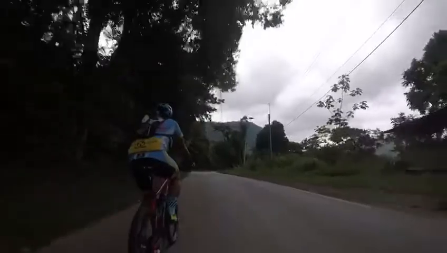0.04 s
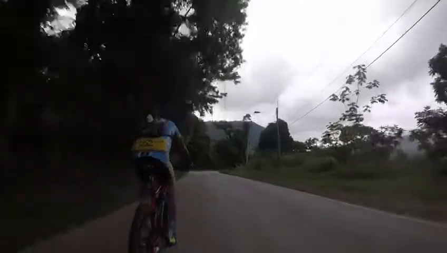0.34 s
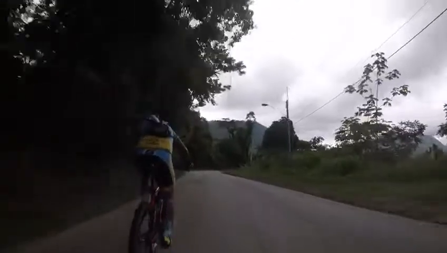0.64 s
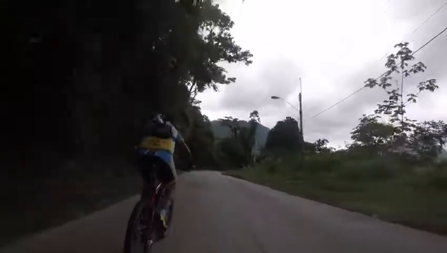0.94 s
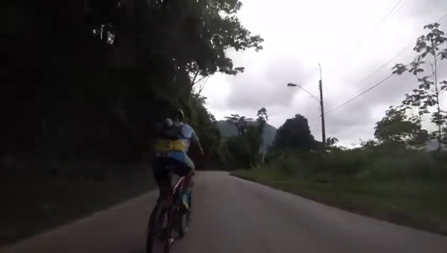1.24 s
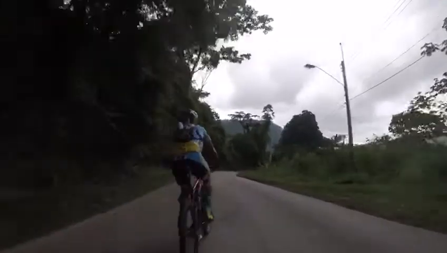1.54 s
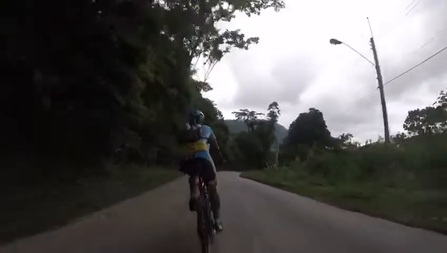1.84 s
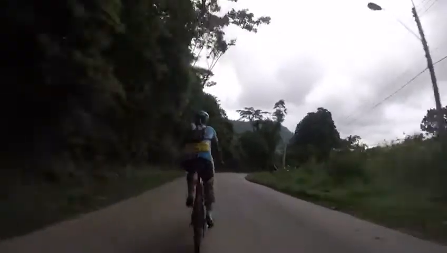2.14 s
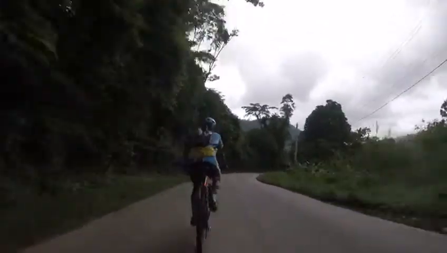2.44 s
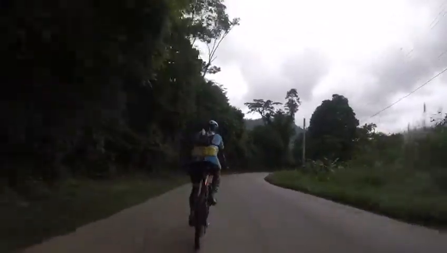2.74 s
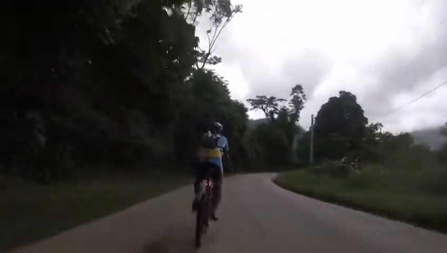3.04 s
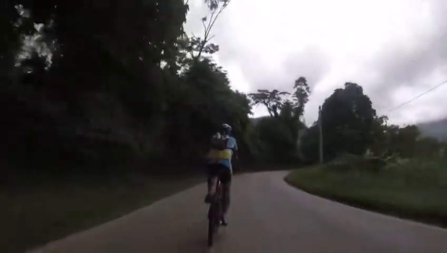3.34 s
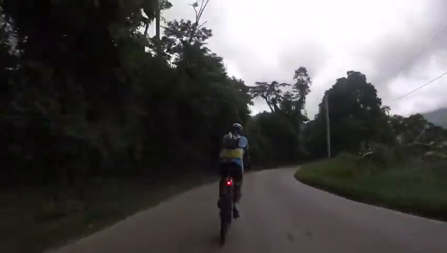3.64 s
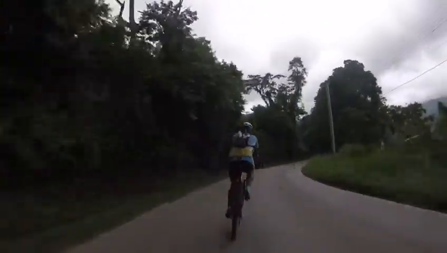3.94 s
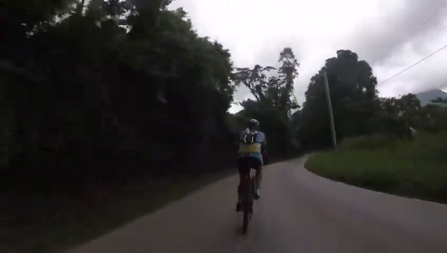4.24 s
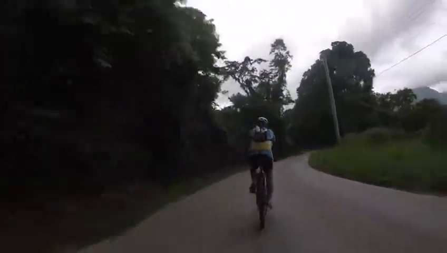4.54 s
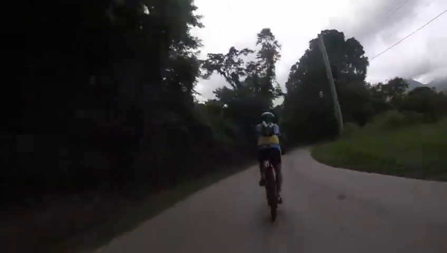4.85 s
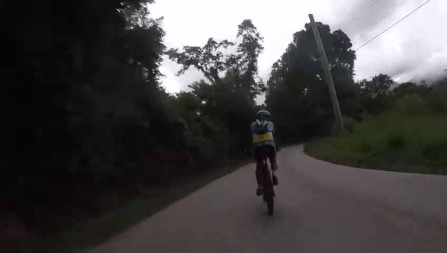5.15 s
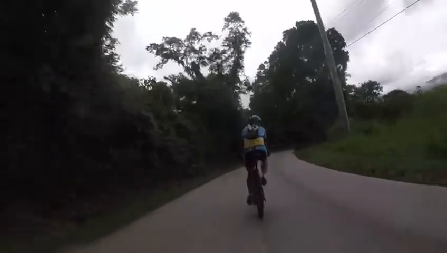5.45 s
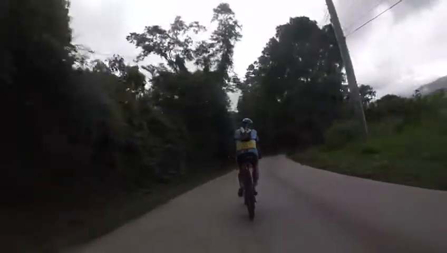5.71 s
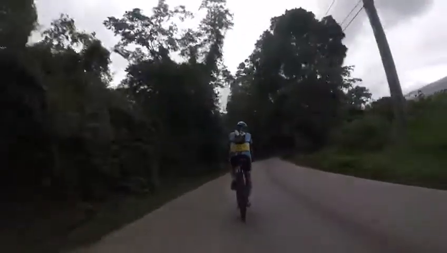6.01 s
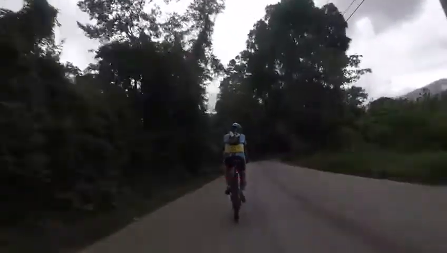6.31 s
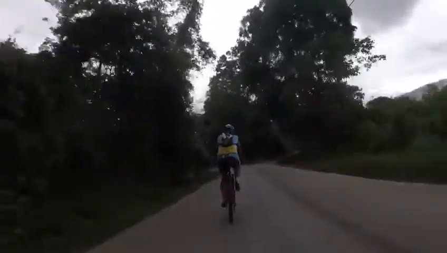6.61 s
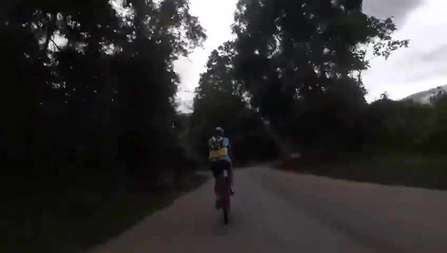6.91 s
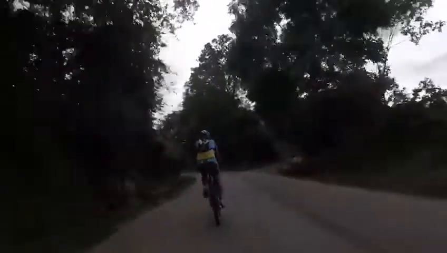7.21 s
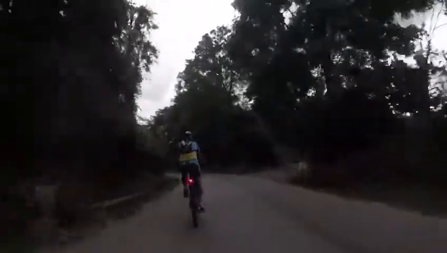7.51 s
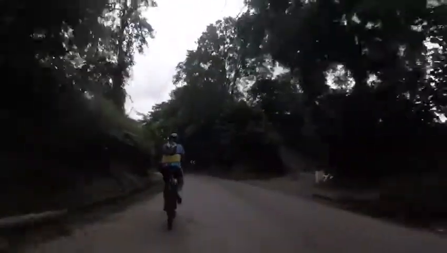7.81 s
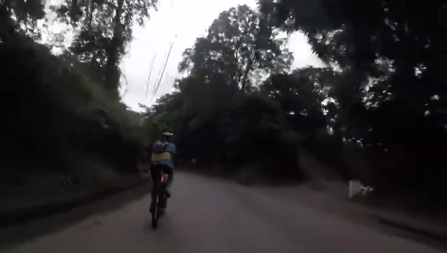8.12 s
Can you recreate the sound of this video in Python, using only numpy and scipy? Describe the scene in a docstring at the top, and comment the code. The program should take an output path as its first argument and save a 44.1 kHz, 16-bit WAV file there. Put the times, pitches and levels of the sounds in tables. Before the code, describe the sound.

Strong wind thumps and roars on the microphone of a fast-moving bicycle for the whole eight seconds, with a ragged rush and short, dull crackles. A thin tyre hiss and a faint, mid-pitched whir lie underneath. During the first two seconds the crackles come thickly and the chain shimmers and jingles lightly. From about 1.8 seconds the roar swells with two low, hollow notes, and the camera mount clicks over bumps around 2 and 3.2 seconds. The whir firms into a hum from 3.7 to 4.7 seconds, ending in a short falling tone. The hollow roar swells again between 5 and 6.5 seconds. The hum returns in pulses from 6.7 to 7.6 seconds, sliding down twice. Around 7.7 seconds rough road rattles the mount and the bicycle frame gives a brief metallic clank, while the wind keeps going.

```python
"""Wind thumps and roars on the microphone of a camera riding a bicycle fast down an open road.
Swirls of air (eddies) rush round the camera's housing, blow two low notes in its hollows and burst
with dull cracks. A whir near 600 Hz firms into a hum in two spells, where the airflow catches it.
Tyres hiss, the chain shimmers, and bumps make the chain jingle, the mount click and the frame clank.
A limiter turns the sound down round the loudest thumps."""
import sys
import numpy as np
from scipy import signal
from scipy.fft import rfft, irfft, next_fast_len
from scipy.io import wavfile
from scipy.ndimage import uniform_filter1d, minimum_filter1d, map_coordinates

SR = 44100
rng = np.random.default_rng(int(sys.argv[2]) if len(sys.argv) > 2 else 0)


def int16_out(signal):
    """Quantize to a 16-bit WAV file."""
    q = np.round(np.clip(np.atleast_2d(signal).T, -1, 1) * 32767)
    wavfile.write(sys.argv[1], SR, q.astype(np.int16))


N = 360297

# Levels in the tables are relative: each sound's own gain is added to them.
# tone colours, from low notes to high (f/Hz, level/dB)
BUFFET_SPECTRUM = [(8, -8), (20, 1), (32, 2.5), (46, -1), (65, -2), (95, -4), (130, -0.5), (155, -16.5),
                   (220, -18), (400, -40.5), (800, -92)]
WAKE_SPECTRUM = [(90, -31.5), (150, 0.5), (225, -2.5), (280, 2), (326, -5), (375, -9), (425, -6),
                 (472, -13), (515, -12), (590, -11.5), (720, -28), (1400, -56), (3000, -100)]
RUSH_SPECTRUM = [(250, -10.5), (450, 6.5), (560, 3.5), (650, 4.5), (750, -1.5), (860, 1), (970, -1.5),
                 (1150, 1.5), (1400, -8.5), (2000, -25), (4000, -33.5), (8000, -86.5)]
RASP_SPECTRUM = [(400, -29), (900, 0), (1450, 4.5), (2000, -0.5), (2800, -8), (3600, -25), (5000, -22),
                 (8000, -40), (12000, -65.5)]
WHIR_SPECTRUM = [(300, -60.5), (500, -23.5), (560, -7.5), (605, -2), (650, -9), (710, -17), (1200, -68),
                 (3000, -110)]
HISS_SPECTRUM = [(1500, -12), (3000, 9), (4200, -2), (4950, 0.5), (5800, -5), (6500, -2), (7500, -5.5),
                 (8600, -11.5), (9400, -9.5), (11000, -12.5), (12500, -29.5)]
CRACK_SPECTRUM = [(400, -21.5), (900, -4.5), (1300, 5), (1600, 7), (2100, -2.5), (2800, -12), (3600, -22.5),
                  (5000, -28.5), (8000, -48), (12000, -71.5)]

# gusts and lulls on the microphone (t/s, length/s, rise/dB)
GUSTS_AND_LULLS = [(-.1, 0.43, -0.5), (.47, 0.25, -1.5), (2.48, .35, -2.5), (4.58, 0.1, 1), (5.0, 0.3, -1),
                   (5.3, 0.21, 0)]
BUFFET_DB, GUST_FADE_S, GUST_SAG_S = -11.5, 0.06, 3
# swells of the wake, the churning air behind the housing (t/s, length/s, rise/dB)
WAKE_SWELLS = [(1.76, 2.17, 6), (2.0, 0.36, 1), (5.18, .25, 3.5), (5.6, .8, 4.5)]
WAKE_DB, WAKE_ATTACK_S, WAKE_RELEASE_S, WAKE_SAG_S = -21, 0.26, 0.25, 14
# swells of the lower and the upper hollow's note (t/s, length/s, rise/dB)
LOW_NOTE_SWELLS = [(.1, 1.46, 3), (1.78, 0.59, 9), (2.45, 1.25, 5), (5.24, .22, 6.5), (5.8, 0.75, 4.5)]
HIGH_NOTE_SWELLS = [(0.8, 0.54, 2.5), (1.783, 1.76, 8.5), (2.78, 0.19, 7), (7.0, 1.04, 6.5)]
LOW_HOLLOW, HIGH_HOLLOW = (323, 23, -27.5), (467, 26, -33)  # f/Hz, width/Hz, level/dB
HOLLOW_FADE_S, HOLLOW_SAG_S = 0.15, 9
# airflow over the housing (t/s, rush level/dB, rasp level/dB, hiss level/dB)
AIRFLOW_LEVELS = [(0.0, -34, -38.5, -52.5), (0.39, -32, -42, -48.5), (0.66, -34, -41, -54),
                  (1.64, -31.5, -40, -52.5), (2.43, -34, -47.5, -57), (3.07, -31, -43.5, -57),
                  (3.41, -33.5, -46, -52), (3.8, -31, -44, -54), (4.57, -29, -41.5, -52),
                  (4.94, -36, -39, -53), (5.3, -29, -40.5, -49.5), (5.55, -33, -41.5, -53),
                  (5.85, -33.5, -40.5, -55.5), (6.78, -30.5, -40.5, -54), (7.14, -30.5, -44.5, -55),
                  (7.64, -29.5, -41, -54.5), (7.9, -35.5, -40.5, -55), (8.17, -36, -37.5, -48)]
CRACKLES_PER_S, CRACKLE_DB, CRACKLE_S = 36, -2.5, 0.004

# the hum's base loudness and the pitch of its tone (t/s, level/dB, f/Hz)
HUM_COURSE = [(0, -34.5, 584), (2.5, -39, 583.5), (3.35, -28.5, 603.6), (3.78, -23.5, 604),
              (4.03, -24, 614), (4.45, -23.5, 612), (4.75, -21, 605.4), (5.3, -28.5, 603), (5.9, -29, 604),
              (6.55, -23.5, 608.7), (7.05, -23, 602.5), (7.55, -24, 603), (8.17, -31, 596.6)]
# the airflow catches the resonance and the hum swells (t/s, length/s, rise/dB)
HUM_SWELLS = [(3.68, 0.83, 6), (4.53, 0.14, 4), (6.72, 0.33, 6), (6.9, 0.14, 2), (7.1, 0.24, 5.5),
              (7.37, 0.17, 5)]
HUM_ATTACK_S, HUM_RELEASE_S, HUM_SAG_S = 0.12, 0.067, 1.8
TONE_DB, TONE_WAVER_HZ, TONE_FLUTTER_DB = -7, 8, 1.5
TONE_DB_PER_DB, WHIR_DB_PER_DB = 1.83, 0.6  # the tone grows faster, so a stronger hum is purer

# spells in which the running chain shimmers (t/s, length/s, rise/dB)
SHIMMER_SWELLS = [(-.2, 0.64, 17), (1.0, 0.49, 8), (4.75, .55, 8.5)]
SHIMMER_DB, SHIMMER_FADE_S, SHIMMER_SAG_S = -73, 0.25, 3
# knocks on the chain, the camera mount and the frame (t/s, level/dB)
CHAIN_JINGLES = [(0.1291, -40), (0.2074, -42.5), (0.231, -40), (0.6769, -35.5), (0.8145, -39),
                 (1.1059, -40), (1.262, -38.5), (1.486, -42), (1.495, -36), (1.566, -44.5), (1.7828, -43),
                 (2.0444, -36), (2.1141, -43.5), (4.7007, -37), (4.783, -40), (5.878, -41), (7.843, -48),
                 (7.902, -47)]
MOUNT_CLICKS = [(1.8976, -30), (1.904, -35), (2.0286, -22.5), (2.159, -42.5), (2.2272, -35.5),
                (2.2488, -35.5), (2.2662, -37.5), (2.5182, -41), (3.1767, -27), (3.2505, -24.5),
                (3.2735, -38), (3.2834, -32), (4.0038, -33), (4.3455, -36.5), (5.4475, -31),
                (5.7683, -37.5), (7.3248, -36.5), (7.6984, -21), (7.7283, -28.5), (7.7628, -35),
                (7.8100, -34), (7.9793, -27.5)]
FRAME_CLANKS = [(7.763, -26.5), (7.784, -17)]
# the notes each part rings with (f/Hz, level/dB, time to fade by 60 dB/s)
CHAIN_NOTES = [(6240, -4, 0.041), (6680, -4, .05), (7250, -5.5, .03), (7930, -6.5, .03), (8900, -11, .025),
               (9800, -20, .025)]
MOUNT_NOTES = [(1324, 9.5, 0.02), (2100, 2.5, 0.011), (2900, 3, 0.005), (3420, -13.5, 0.008),
               (4740, -8.5, 0.012), (5020, -3, 0.0098), (6390, -5, 0.007), (6980, -4.5, 0.0058),
               (8500, -15, 0.008)]
FRAME_NOTES = [(1440, 4.5, 0.054), (1570, -5, 0.054), (4760, -15, 0.037), (5470, -18, 0.041),
               (6380, -25, 0.034)]
STRIKE_SCATTER_DB = 2.5

# eddies that burst on the housing (t/s, level/dB, decay before stretching/s)
EDDY_BURSTS = [(0.441, -14, 0.0024), (0.477, -19.5, 0.0044), (0.535, -21, 0.0022), (0.603, -22.5, 0.0035),
               (0.676, -19, 0.002), (0.696, -18, 0.0018), (0.759, -22, 0.0012), (0.831, -22, .004),
               (0.889, -20, 0.0015), (0.922, -22, 0.0035), (0.945, -18.5, .0026), (0.964, -26, 0.0044),
               (0.996, -23, 0.0022), (1.125, -22, 0.0033), (1.15, -19.5, 0.0013), (1.297, -23, 0.0024),
               (1.367, -20, 0.002), (1.425, -20, 0.0018), (1.508, -18, 0.0043), (1.52, -21, .003),
               (1.567, -19, 0.0028), (1.651, -22, 0.0025), (1.757, -22.5, 0.0026), (1.905, -23, 0.0034),
               (2.262, -26, 0.01), (2.516, -26, 0.0031), (2.635, -24.5, 0.008), (3.548, -25.5, .003),
               (4.007, -20.5, 0.0048), (4.03, -23, 0.0033), (4.314, -22, 0.0035), (4.365, -21.5, 0.0024),
               (4.705, -23, 0.0057), (4.781, -19.5, 0.011), (4.936, -24, .003), (5.02, -25, .003),
               (5.329, -17, 0.0034), (5.347, -20, 0.0032), (5.401, -22, 0.006), (5.449, -22, 0.0022),
               (5.528, -19, 0.003), (5.61, -21, 0.002), (5.794, -24, .002), (5.81, -24, 0.0022),
               (6.016, -19.5, 0.0019), (6.493, -22, 0.0025), (7.327, -25, .004), (7.644, -25.5, 0.0049),
               (7.839, -20, 0.0017), (7.9, -22.5, 0.0033), (7.916, -23.5, 0.0027), (8.009, -19, 0.0035),
               (8.028, -22, 0.0036), (8.072, -18, 0.005)]
# rough patches of road that shake the mount (t/s, length/s, level/dB)
ROUGH_PATCHES = [(1.873, .42, -47.5), (5.4, .5, -49), (7.669, .15, -38.5), (7.86, .2, -45)]
CHATTER_PER_S, CHATTER_SCATTER_DB = 110, 3
# the airflow lets go and a tone slides down (t/s, level/dB)
FALLING_TONES = [(4.66, -23.5), (7.03, -23), (7.58, -23)]
SLIDE_FROM_HZ, SLIDE_TO_HZ, SLIDE_S = 690, 425.5, 0.1353
CEILING, TOP_HZ = 0.92, 11900


def amp(db):
    """Turn decibels into a number to multiply by."""
    return 10 ** (np.asarray(db) / 20)


def unit(x):
    """Scale a signal to an average strength (rms) of 1."""
    return x / np.sqrt(np.mean(x ** 2) + 1e-20)


def curves(rows):
    """Join a table's points with lines: one curve for each column after the time."""
    times, *columns = np.transpose(rows)
    return [np.interp(np.arange(N) / SR, times, column) for column in columns]


def wobble(rate):
    """A smooth random curve that heads for a new value rate times a second."""
    return map_coordinates(rng.standard_normal(int(N * rate / SR) + 4), [np.arange(N) * rate / SR])


def swells(rows, attack_s, release_s, sag_s):
    """Rise in dB over time: each swell climbs, sags slowly and falls back after its length."""
    t = np.arange(N) / SR
    rise = np.zeros(N)
    for s, length, db in rows:
        climb = np.clip((t - s) / attack_s, 0, 1)
        sag = np.exp(-np.maximum(t - s - attack_s, 0) / sag_s)
        fall = np.clip(1 - (t - s - length) / release_s, 0, 1)
        rise += db * climb * sag * fall
    return rise


def filtered(x, response):
    """Turn each frequency in x up or down by response(hz)."""
    size = next_fast_len(N + SR // 2)
    return irfft(rfft(x, size) * response(np.fft.rfftfreq(size, 1 / SR)), size)[:N]


def noise(spectrum):
    """Noise of strength 1 with the given tone colour."""
    f, db = np.transpose(spectrum)
    return unit(filtered(rng.standard_normal(N), lambda hz: amp(np.interp(np.log(hz + 1), np.log(f), db))))


def resonant(centre_hz, width_hz):
    """Noise of strength 1 ringing round one pitch: a resonance."""
    return unit(filtered(rng.standard_normal(N), lambda f: 1 / (1 + ((f - centre_hz) / width_hz) ** 2)))


def steadied(x, seconds):
    """Even out a signal's slow swells, holding its strength near 1."""
    return x / np.sqrt(np.abs(uniform_filter1d(x * x, int(seconds * SR))) + 1e-6)


def add(track, s, sound):
    """Mix a sound into a track at s seconds."""
    part = track[max(0, round(s * SR)):][:len(sound)]
    part += sound[:len(part)]


def buffeting(thump_db, stretch):
    """Large eddies thump the microphone, softer in lulls and hardest where one bursts."""
    gusts = swells(GUSTS_AND_LULLS, GUST_FADE_S, GUST_FADE_S, GUST_SAG_S)
    strength = amp(BUFFET_DB + gusts) + amp(thump_db) * bursts(stretch)
    return strength * steadied(noise(BUFFET_SPECTRUM), seconds=0.086)


def wake(flutter_db):
    """Air roars behind the housing in long swells and blows its two hollows like bottles."""
    rise = swells(WAKE_SWELLS, WAKE_ATTACK_S, WAKE_RELEASE_S, WAKE_SAG_S) + flutter_db * wobble(10)
    sound = amp(WAKE_DB + rise) * steadied(noise(WAKE_SPECTRUM), seconds=0.25)
    for (hz, width, db), rows in ((LOW_HOLLOW, LOW_NOTE_SWELLS), (HIGH_HOLLOW, HIGH_NOTE_SWELLS)):
        lift = swells(rows, HOLLOW_FADE_S, HOLLOW_FADE_S, HOLLOW_SAG_S)
        sound += amp(db + lift) * steadied(resonant(hz, width), seconds=0.15)
    return sound


def rush(level, puffs, puff_db, flutter_db, burst_db, stretch):
    """Smaller eddies rush round the housing, swelling with each puff and burst."""
    strength = amp(level + puff_db * puffs) + amp(burst_db) * bursts(stretch)
    return strength * unit(noise(RUSH_SPECTRUM) * amp(flutter_db * wobble(45)))


def rasp(level, puffs, puff_db, flutter_db, grain_db):
    """The finest swirls of air rasp in ragged puffs and crackles."""
    puffing = amp(puff_db * puffs + flutter_db * wobble(50))
    ragged = unit(puffing * (1 + amp(CRACKLE_DB) * crackles()))
    return amp(level) * ragged * unit(noise(RASP_SPECTRUM) * amp(grain_db * wobble(350)))


def crackles():
    """Small eddies tear off at random, each a short spike in strength."""
    chance, size = rng.random(N), rng.random(N)
    t = np.arange(-SR // 25, SR // 25) / SR
    spike = np.exp(-np.abs(t) / CRACKLE_S)
    return signal.fftconvolve((chance < CRACKLES_PER_S / SR) * size, spike, "same")


def hum(whir_db, octave_db):
    """Air whirs in a resonance and an octave above; where the flow catches it, a tone takes over."""
    level, pitch = curves(HUM_COURSE)
    rise = swells(HUM_SWELLS, HUM_ATTACK_S, HUM_RELEASE_S, HUM_SAG_S)
    phase = 2 * np.pi * np.cumsum(pitch + TONE_WAVER_HZ * wobble(110)) / SR
    tone = steadied(np.sin(phase) * amp(TONE_FLUTTER_DB * wobble(45)), seconds=0.1)
    whir = amp(whir_db) * steadied(noise(WHIR_SPECTRUM), seconds=0.08)
    whir += amp(octave_db) * resonant(centre_hz=1177, width_hz=75)
    return amp(level) * (amp(TONE_DB + TONE_DB_PER_DB * rise) * tone + amp(WHIR_DB_PER_DB * rise) * whir)


def hiss(level, grain_db):
    """Tyres and air make a thin, grainy hiss."""
    return amp(level) * unit(noise(HISS_SPECTRUM) * amp(grain_db * wobble(200)))


def shimmer(flutter_db, width_hz):
    """The running links keep the chain's two lowest notes faintly ringing."""
    level = SHIMMER_DB + swells(SHIMMER_SWELLS, SHIMMER_FADE_S, SHIMMER_FADE_S, SHIMMER_SAG_S)
    peaks = lambda f: sum(amp(db) / (1 + ((f - hz) / width_hz) ** 2) for hz, db, _ in CHAIN_NOTES[:2])
    return amp(level) * unit(filtered(rng.standard_normal(N), peaks) * amp(flutter_db * wobble(40)))


def rattle(hits, notes, level_db, crack_db, crack_fade_s):
    """Each knock gives a short crack and rings the part's notes a little differently."""
    track, t = np.zeros(N), np.arange(SR // 8) / SR
    onset = 1 - np.exp(-t / 0.00025)
    for s, db in hits:
        ring = np.zeros(len(t))
        for hz, note_db, fade_s in notes:
            strength = amp(note_db + rng.normal(0, STRIKE_SCATTER_DB) - 60 * t / fade_s)
            ring += strength * np.sin(2 * np.pi * hz * rng.normal(1, 0.01) * t)
        crack = amp(crack_db - 60 * t / crack_fade_s) * rng.standard_normal(len(t))
        add(track, s + 0.001, amp(db + level_db) * (ring + crack) * onset)
    return track


def bursts(stretch):
    """Each bursting eddy is a short spike in strength; a larger stretch makes it last longer."""
    t = np.arange(N) / SR
    return sum(amp(db) / np.cosh(np.minimum(np.abs(t - s) / (stretch * decay_s), 20))
               for s, db, decay_s in EDDY_BURSTS)


def eddy_cracks(level_db, stretch):
    """Each bursting eddy gives a short, dull crack."""
    return amp(level_db) * bursts(stretch) * steadied(noise(CRACK_SPECTRUM), seconds=0.0053)


def chatter():
    """Rough road shakes the mount: a list of faint, random knocks (t/s, level/dB)."""
    return [(s + length * rng.random(), db + rng.normal(0, CHATTER_SCATTER_DB))
            for s, length, db in ROUGH_PATCHES for _ in range(int(CHATTER_PER_S * length))]


def slides(waver_hz):
    """As the airflow lets go of the resonance, a short, unsteady tone sinks away below it."""
    track, progress = np.zeros(N), np.linspace(0, 1, int(SLIDE_S * SR))
    glide = SLIDE_FROM_HZ + (SLIDE_TO_HZ - SLIDE_FROM_HZ) * progress
    arch = np.sqrt(2) * np.sin(np.pi * progress)
    for s, db in FALLING_TONES:
        pitch = glide + waver_hz * wobble(170)[:len(progress)]
        add(track, s, amp(db) * arch * np.sin(2 * np.pi * np.cumsum(pitch) / SR))
    return track


def scene():
    """Wind over the rolling, rattling bicycle; the same puffs stir the rush and the rasp."""
    rush_db, rasp_db, hiss_db = curves(AIRFLOW_LEVELS)
    puffs = wobble(16)
    air = buffeting(thump_db=-8, stretch=0.66) + wake(flutter_db=1.35)
    air += rush(rush_db + 5.0, puffs, puff_db=1.1, flutter_db=1.88, burst_db=-9.5, stretch=0.7)
    air += rasp(rasp_db + 3.0, puffs, puff_db=1.5, flutter_db=1.0, grain_db=2.0)
    air += eddy_cracks(level_db=-7.0, stretch=1.0)
    air += hum(whir_db=-3.5, octave_db=-16.5) + slides(waver_hz=25.2)
    bicycle = hiss(hiss_db + 0.5, grain_db=1.5) + shimmer(flutter_db=4.5, width_hz=140)
    bicycle += rattle(MOUNT_CLICKS, MOUNT_NOTES, level_db=0, crack_db=-4.5, crack_fade_s=0.0062)
    bicycle += rattle(CHAIN_JINGLES, CHAIN_NOTES, level_db=-5, crack_db=-12.5, crack_fade_s=0.035)
    bicycle += rattle(FRAME_CLANKS, FRAME_NOTES, level_db=-4, crack_db=-18, crack_fade_s=0.012)
    bicycle += rattle(chatter(), MOUNT_NOTES, level_db=-1, crack_db=-5.5, crack_fade_s=0.006)
    return (air + bicycle)[None]


def limiter(x, ceiling, hold_s):
    """The volume dips smoothly round every peak above the ceiling."""
    size = int(hold_s * SR)
    gain = minimum_filter1d(np.minimum(1, ceiling / (np.abs(x) + 1e-9)), size)
    return x * uniform_filter1d(uniform_filter1d(gain, size // 2), size // 2)


def record(dry):
    """The housing dulls the highest treble; the camera limits peaks and keeps nothing above TOP_HZ."""
    dulled = filtered(dry[0], lambda hz: 1 / np.sqrt(1 + (hz / 9800) ** 14))
    limited = limiter(dulled, ceiling=CEILING, hold_s=0.037)
    return filtered(limited, lambda hz: hz < TOP_HZ)[None]


dry = scene()
out = record(dry)
int16_out(out)
```